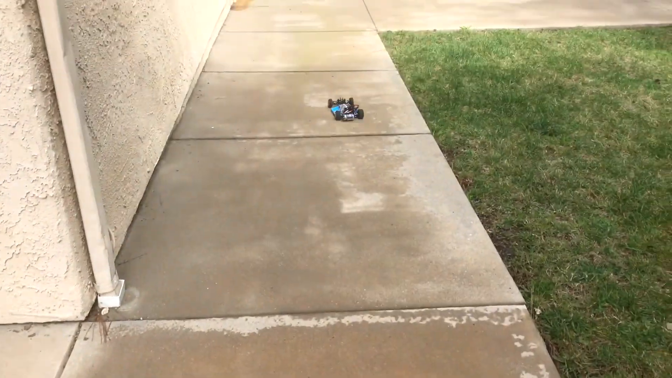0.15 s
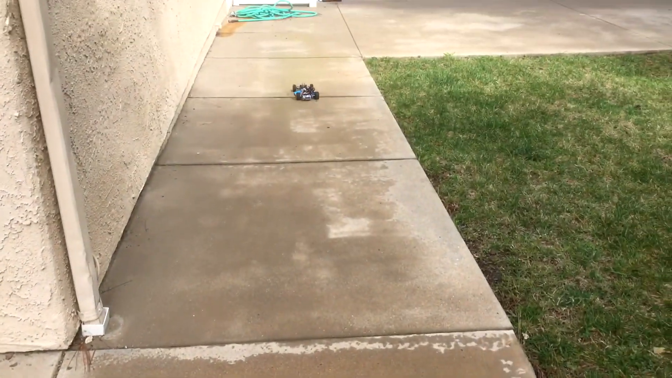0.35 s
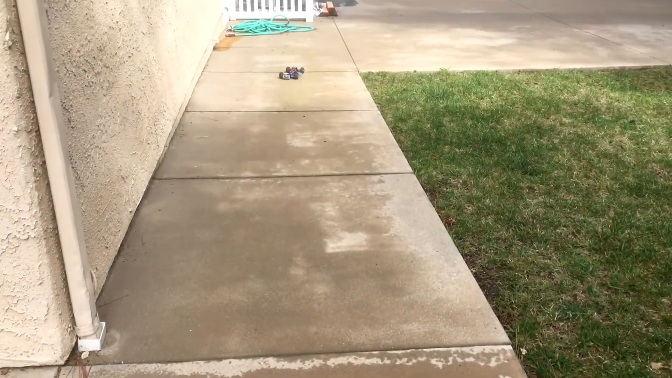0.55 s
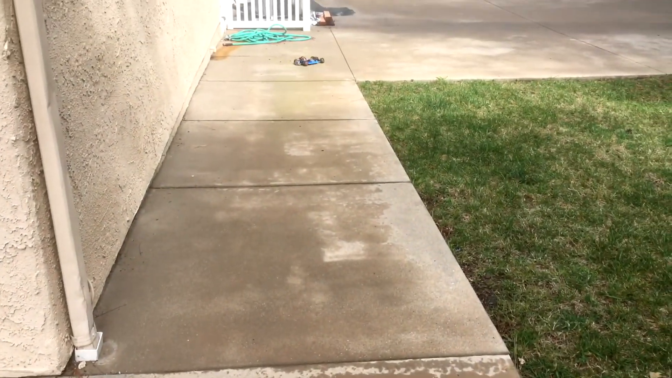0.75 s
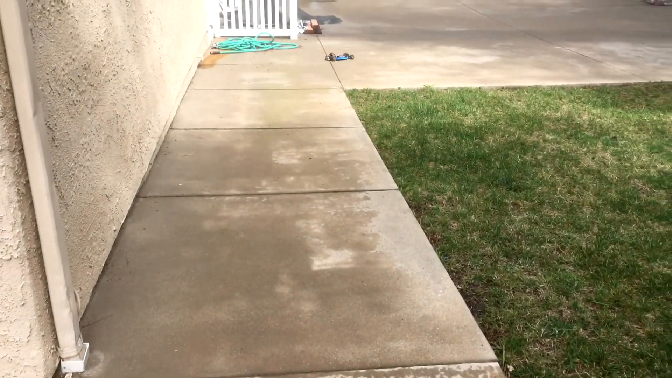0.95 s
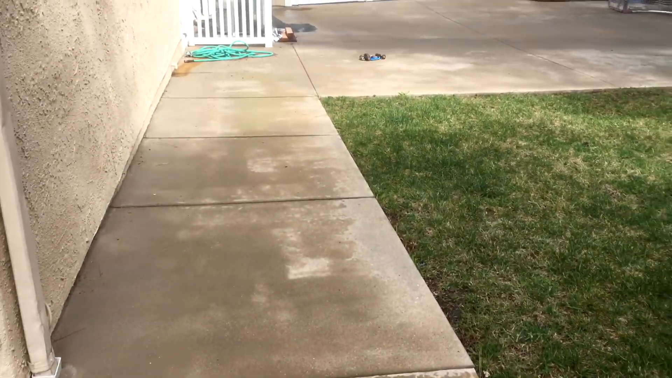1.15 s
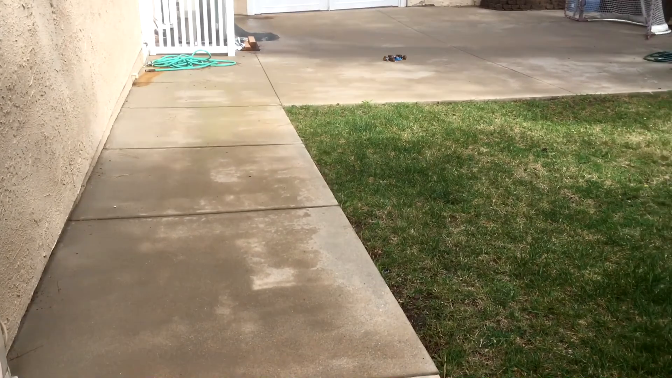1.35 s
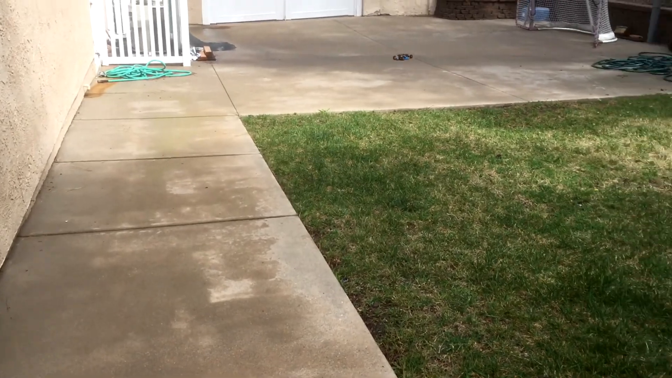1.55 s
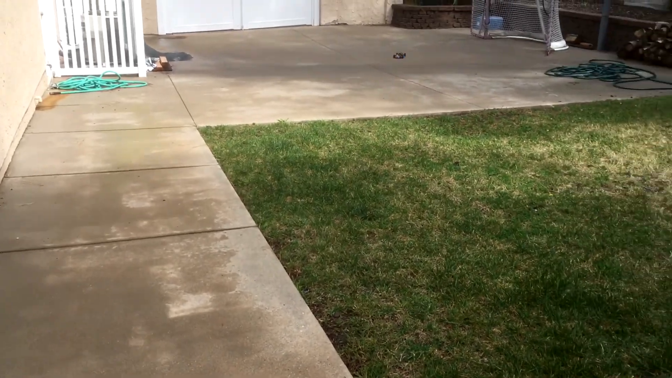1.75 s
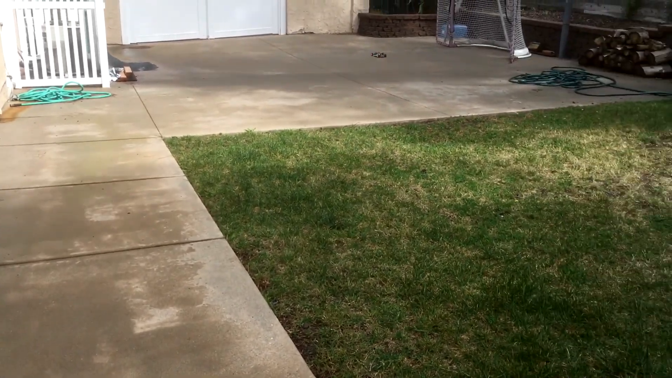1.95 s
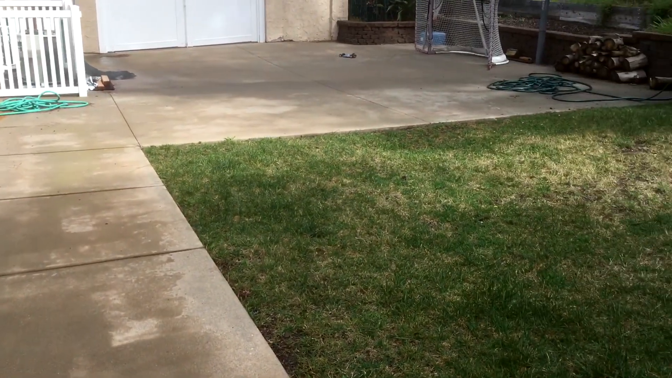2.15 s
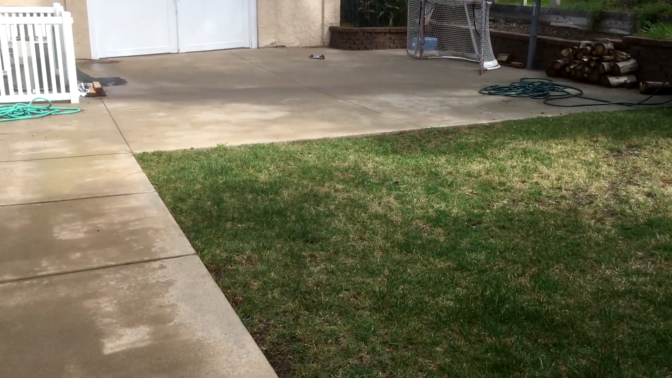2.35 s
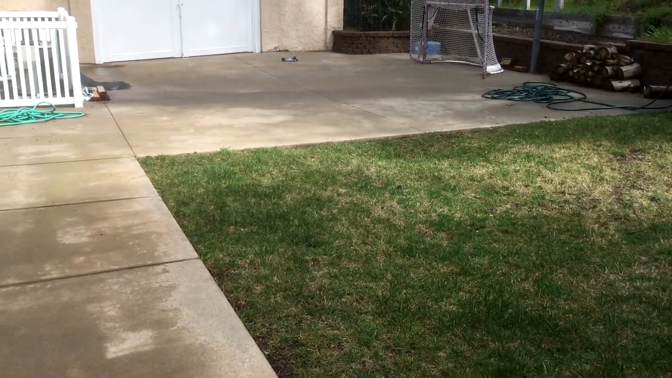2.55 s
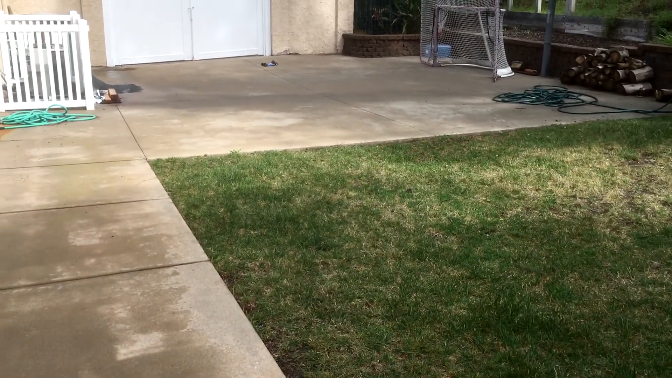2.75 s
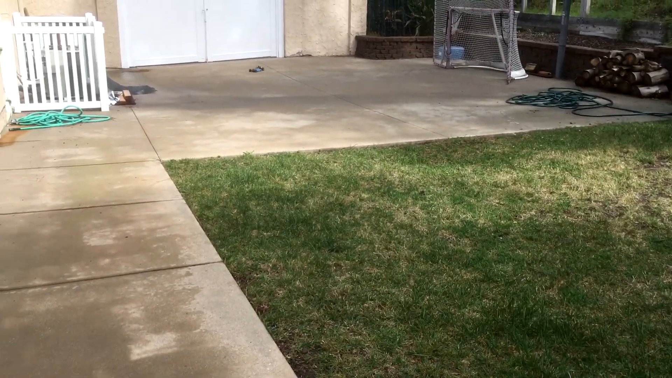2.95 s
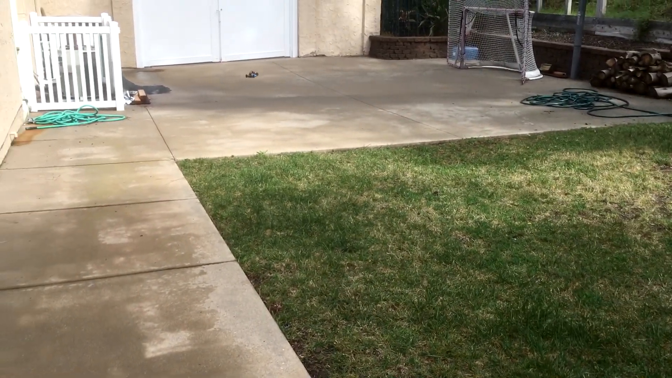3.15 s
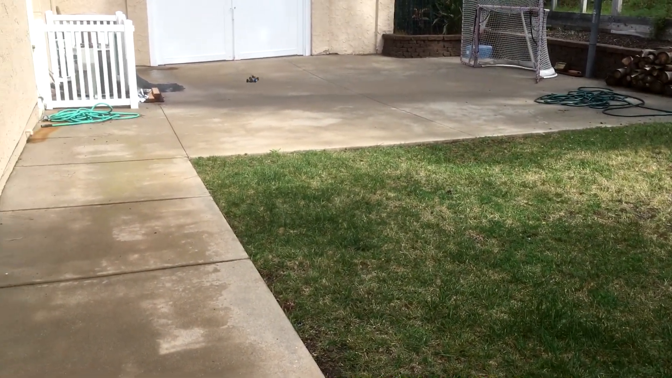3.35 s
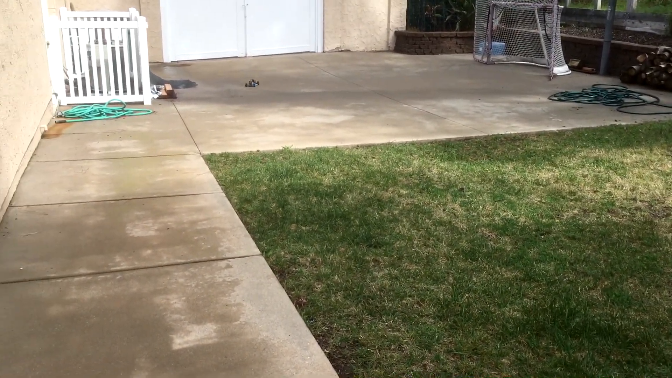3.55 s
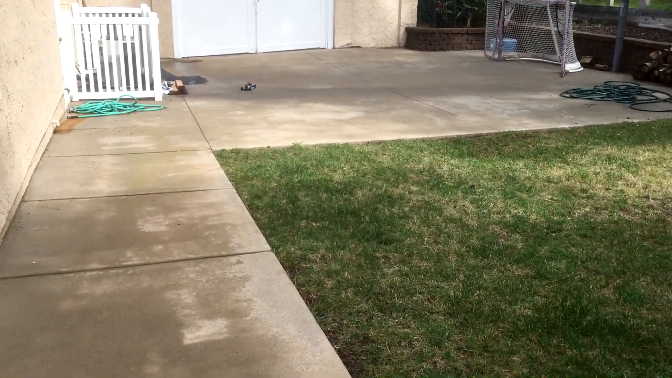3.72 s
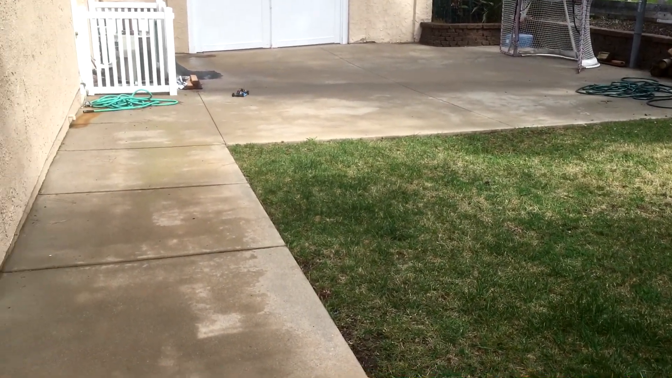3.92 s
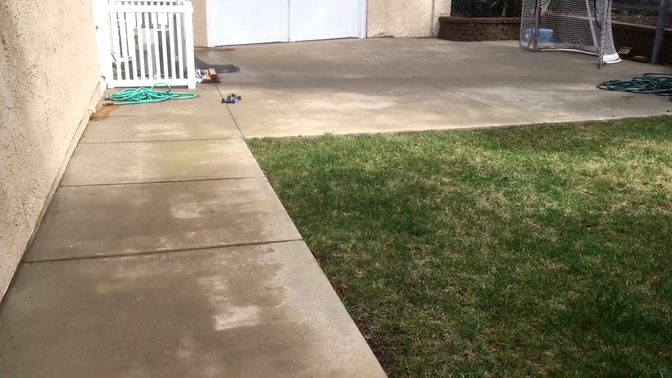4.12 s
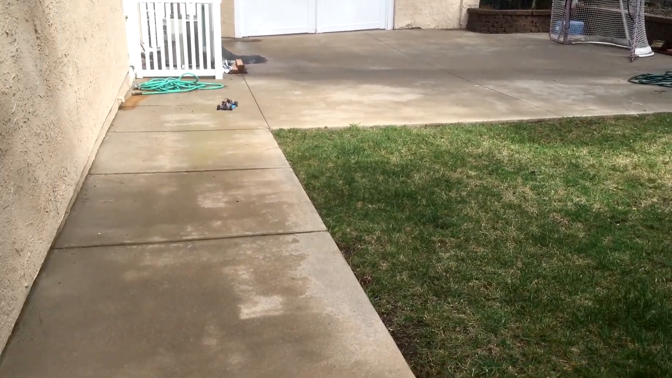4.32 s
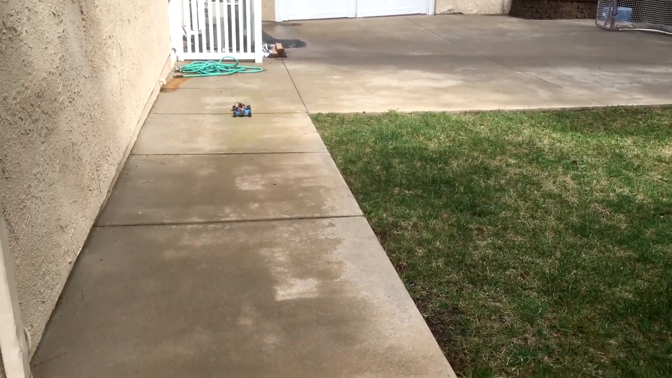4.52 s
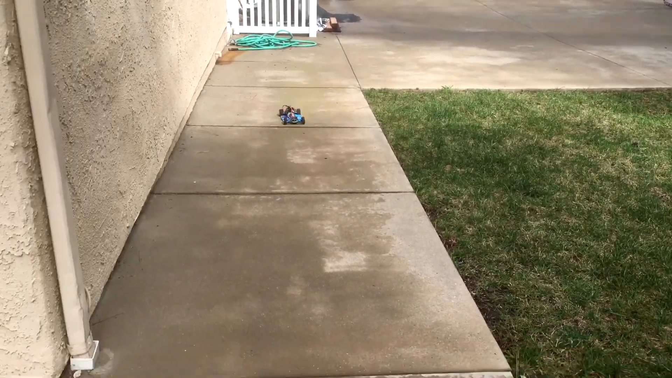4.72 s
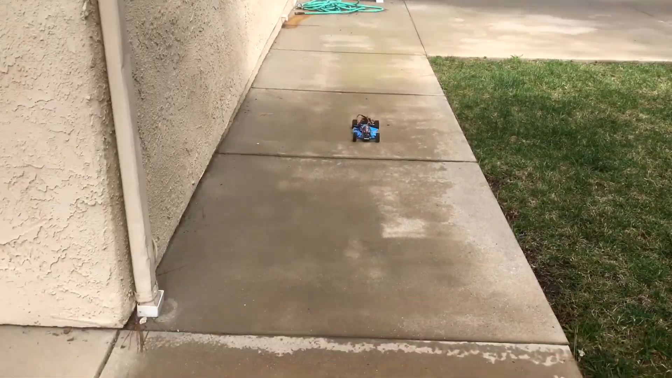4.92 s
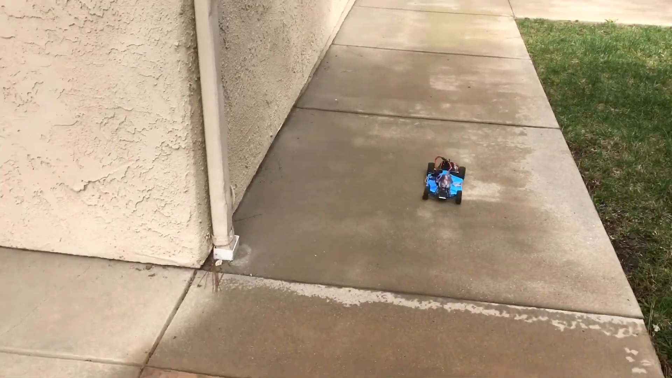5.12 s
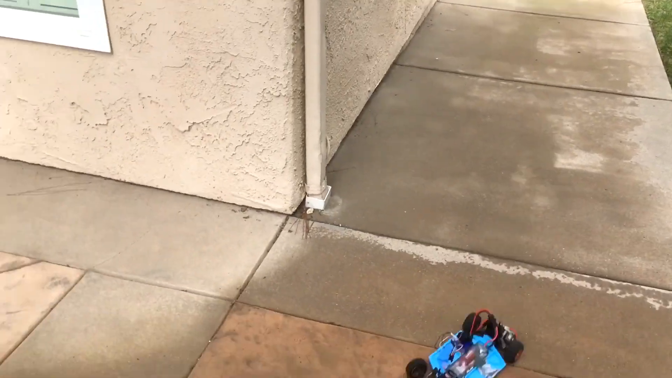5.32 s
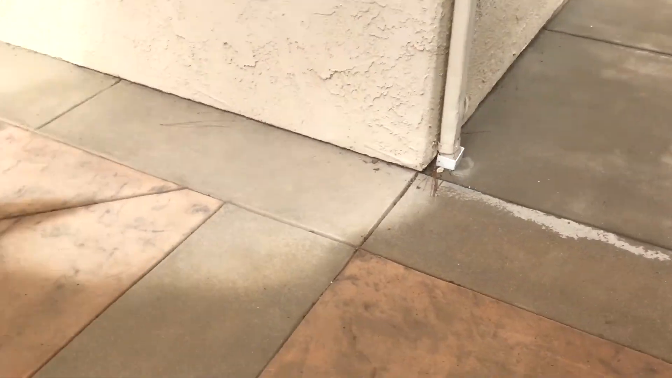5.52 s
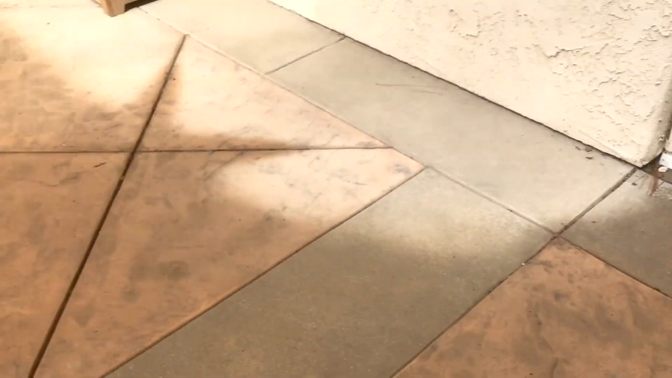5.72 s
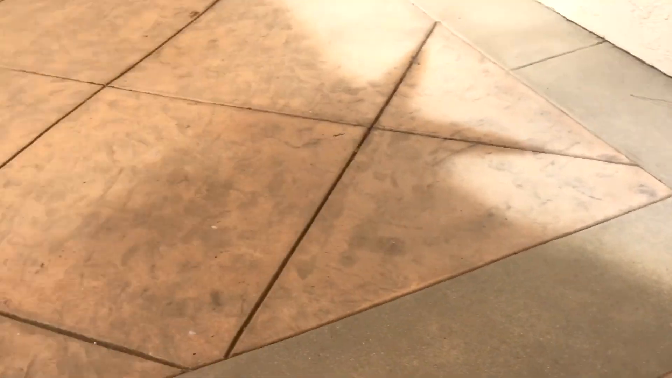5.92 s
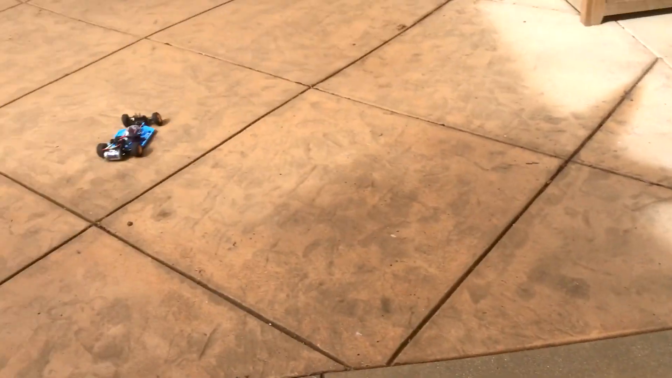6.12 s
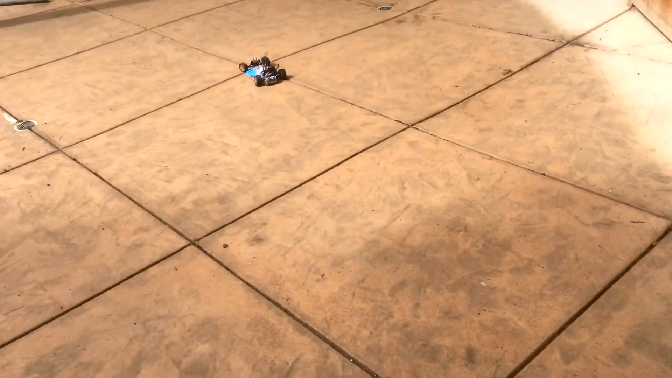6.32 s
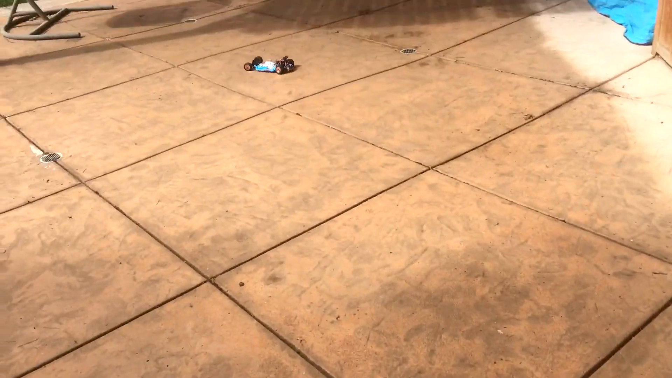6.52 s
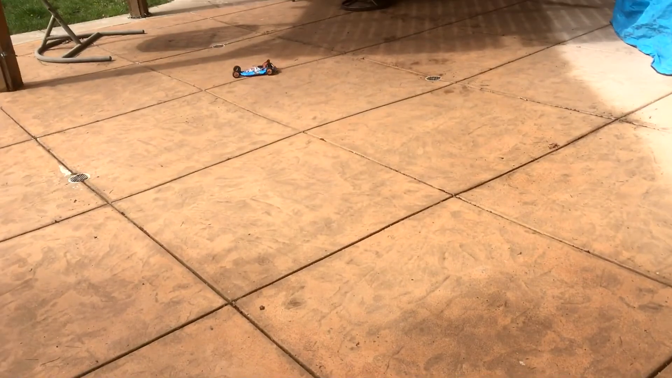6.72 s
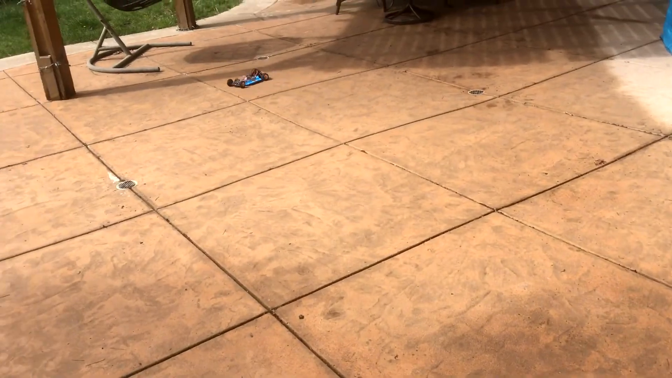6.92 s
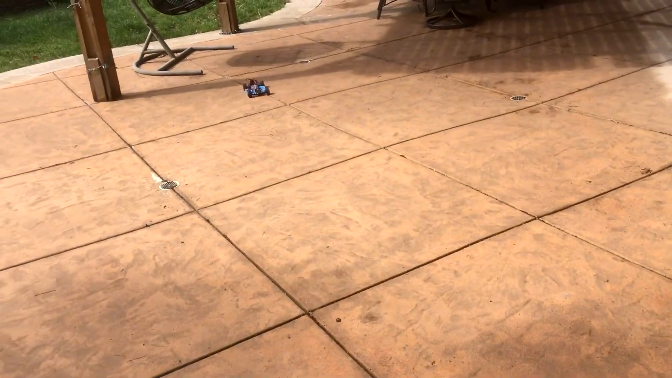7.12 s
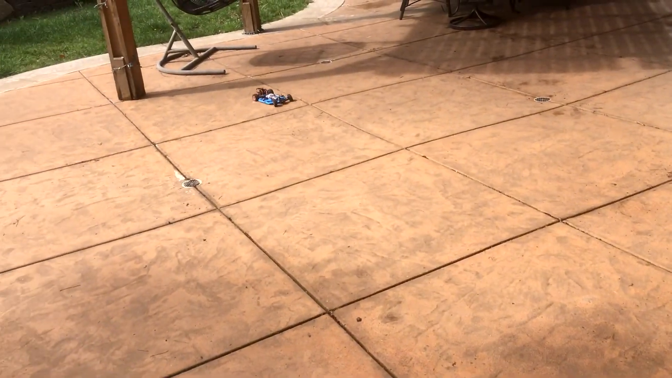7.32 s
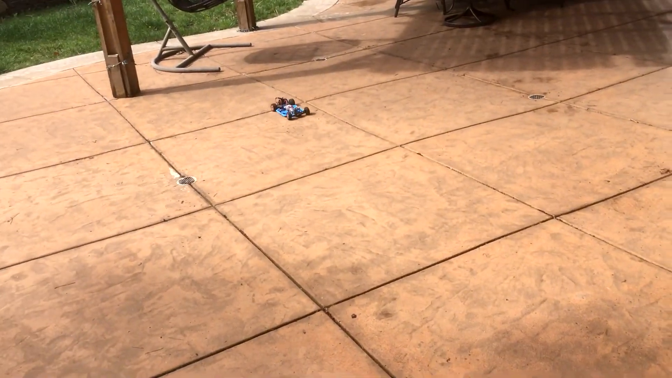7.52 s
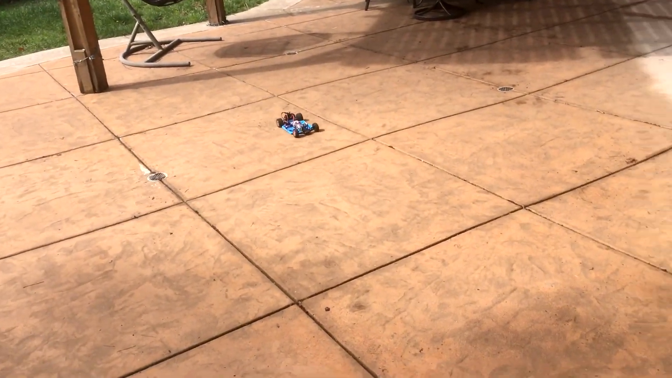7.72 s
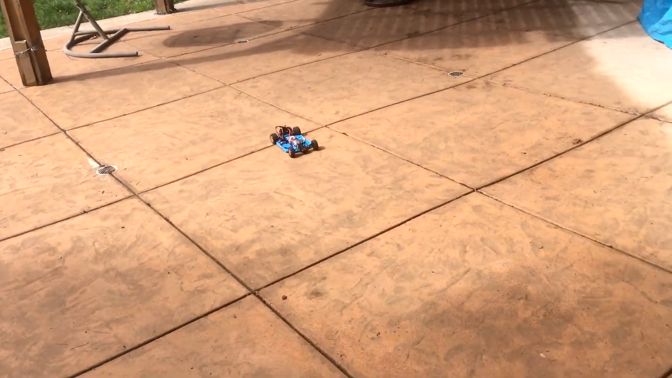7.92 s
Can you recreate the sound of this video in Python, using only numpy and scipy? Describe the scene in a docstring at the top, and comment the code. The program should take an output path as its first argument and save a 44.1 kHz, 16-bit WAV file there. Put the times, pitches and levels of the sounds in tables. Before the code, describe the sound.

A small electric remote-control car races away over concrete, its plastic gears giving a high, hissing rasp and whine, with two light clicks in the first second. Soft wind bumps the microphone over a faint outdoor hush. The whine peaks near 1.7 seconds, then the tyres roar on grit in a distant turn around 2 seconds. The pitch sinks and the car is far off near 2.7 seconds, with a slight sweeping echo from a wall. From 3 seconds it returns, rising in pitch and growing louder, with a low wind puff at 4.2 seconds. It passes close and loudest around 5.5 seconds, tyres scrubbing and the plastic body knocking quickly over slab joints between 5.2 and 5.9 seconds. With the breeze eased, it circles in short throttle bursts and draws away, slowing, knocking lightly twice near 7.8 seconds and speeding up again at the end.

```python
"""A small electric toy car races away over concrete while light wind bumps the microphone.
Its plastic gears whine and rasp, louder under load and softer off the throttle. About 2 s in, the
tyres roar on the grit as it turns in the far yard, and a house wall adds a sweeping echo.
It comes back, growing louder, and passes close at 5.5 s, knocking over joints in the slabs.
By then the breeze has eased, and the car circles a patio and draws away."""
import sys
import numpy as np
from scipy import signal
from scipy.fft import rfft, irfft, next_fast_len
from scipy.io import wavfile
from scipy.ndimage import uniform_filter1d, map_coordinates

SR = 44100
rng = np.random.default_rng(int(sys.argv[2]) if len(sys.argv) > 2 else 0)


def put_to_file(sound):
    """Save the sound as 16-bit audio at rate SR, in the file named by the first command-line argument."""
    columns = np.atleast_2d(sound).T  # one column per channel
    safe = np.clip(columns, -1, 1)
    whole_steps = np.round(safe * 32767)
    wavfile.write(sys.argv[1], SR, whole_steps.astype(np.int16))


N = 355887


def amp(db):
    """Turn decibels into a gain."""
    return 10 ** (np.asarray(db) / 20)


def unit(x):
    """Scale a signal to an average (rms) size of 1."""
    return x / np.sqrt(np.mean(x ** 2) + 1e-20)


def along(points, hz):
    """Read between (frequency, value) points on a log frequency axis."""
    f, values = np.transpose(points)
    return np.interp(np.log(hz + 1), np.log(f), values)


def curves(rows):
    """Join (time, values..) rows with straight lines: one curve per value column."""
    times, *columns = np.transpose(rows)
    return [np.interp(np.arange(N) / SR, times, column) for column in columns]


def spells(rows, rise_s, fall_s):
    """Each (start, length, values..) row rises, holds and falls: one sum per value column."""
    t = np.arange(N) / SR
    ramps = [np.minimum((t - s) / rise_s, 1 - (t - s - length) / fall_s) for s, length, *_ in rows]
    return np.array(rows)[:, 2:].T @ np.clip(ramps, 0, 1)


def wobble(rate):
    """A smooth random curve through `rate` new values a second."""
    return map_coordinates(rng.standard_normal(int(N * rate / SR) + 4), [np.arange(N) * rate / SR])


def filtered(x, response):
    """Give each frequency in x the gain response(hz)."""
    size = next_fast_len(N + SR // 4)
    return irfft(rfft(x, size) * response(np.fft.rfftfreq(size, 1 / SR)), size)[:N]


def coloured(x, spectrum):
    """Give x a tone colour (which pitches are strong), at size 1."""
    return unit(filtered(x, lambda hz: amp(along(spectrum, hz))))


def noise():
    """Plain white noise."""
    return rng.standard_normal(N)


def band(centre_hz, width_hz):
    """A tone blurred into a narrow band of noise, at size 1."""
    blur = [filtered(noise(), lambda hz: 1 / (1 + (hz / (1.02 * width_hz)) ** 2) ** 1.58)
            for _ in range(2)]
    phase = 2 * np.pi * np.cumsum(centre_hz * np.ones(N)) / SR
    return unit(blur[0] * np.cos(phase) + blur[1] * np.sin(phase))


# tone colours of the distant hush and of wind on the microphone: f/Hz, level/dB
HUSH_COLOUR = [(20, -23.5), (55, -3.5), (100, 2.5), (200, -0.5), (350, 1.5), (550, -2), (900, 3),
               (1400, -5.5), (2500, -10), (5000, -11), (16000, -46)]
WIND_COLOUR = [(15, -28), (35, -6.5), (55, 3), (90, -8), (160, -22), (400, -61)]
# puffs of wind: t/s, level/dB
PUFFS = [(.02, -59), (.47, -53), (.75, -57), (.99, -52), (1.18, -58), (1.33, -47.5), (1.49, -46),
         (3.56, -50), (3.82, -58), (4.18, -40.5)]

def outdoors(hush_db=-55, breeze_db=-64, ease_at_s=4.95, ease_db=5, puff_s=0.021):
    """A distant hush, a breeze that eases, and puffs that swell and die on the microphone."""
    t = np.arange(N) / SR
    eased = np.clip(2 * (t - ease_at_s), 0, 1)
    wind = amp(breeze_db + 2 * wobble(5.5) - ease_db * eased)
    for s, db in PUFFS:
        age = np.maximum(t - s, 0) / puff_s
        wind = wind + amp(db - 1) * age * np.exp(1 - age)
    return amp(hush_db) * coloured(noise(), HUSH_COLOUR) + wind * coloured(noise(), WIND_COLOUR)


# how long the yard's echo takes to fade by 60 dB: f/Hz, t/s
YARD_FADE = [(200, 0.36), (2000, 0.3), (12000, 0.09)]

def yard_echo(x):
    """Fences and buildings send back a short, blurred echo."""
    hz, t, slices = signal.stft(rng.standard_normal(SR // 2), SR, nperseg=256)
    fade = amp(-60 * t / along(YARD_FADE, hz)[:, None])
    tail = signal.istft(slices * fade, SR, nperseg=256)[1]
    late_tail = np.pad(tail, (SR // 100, 0)) / np.linalg.norm(tail)
    return signal.fftconvolve(x, late_tail)[:N]


# the lag of the wall's echo, longest in the far yard: t/s, delay/s
WALL_DELAY = [(0, 0.00063), (.6, .00054), (1.1, 0.00074), (1.7, 0.0024), (2.4, 0.002), (4.3, 0.00071),
              (5.2, .00063), (6.1, 0.000725), (8.07, .00064)]

def wall_echo(x, gain=0.24, dull_hz=11000):
    """A rough wall scatters the treble and returns the rest; the changing lag makes a sweep."""
    delay_s, = curves(WALL_DELAY)
    echo = filtered(x, lambda hz: 1 / np.sqrt(1 + (hz / dull_hz) ** 4))
    return gain * map_coordinates(echo, [np.arange(N) - delay_s * SR])


# how far the car is from the microphone: t/s, distance/m
PATH = [(0, 3.64), (.5, 4.63), (1.2, 6.18), (2, 9.4), (2.7, 13.2), (3.95, 8.16), (4.4, 5.6), (4.95, 4.48),
        (5.5, 2), (6.2, 2.57), (6.7, 3.4), (7.25, 4.5), (8.07, 6)]

def distance_db():
    """Sound thins out with distance: 0 dB at 1 m, less farther off."""
    return -20 * np.log10(curves(PATH)[0])


def heading(scale_m_per_s=3):
    """Near +1 while the car comes quickly closer, near -1 while it races away."""
    closing_speed = -np.gradient(curves(PATH)[0]) * SR
    return np.tanh(uniform_filter1d(closing_speed, size=SR // 3) / scale_m_per_s)


# the tyres scrub in the turns: t/s, length/s, extra level/dB
TURNS = [(.62, 0.32, 9), (1.8, .48, 10.5), (5.28, 0.49, 10.5), (6.42, 0.15, 7)]
# a low, hollow hum as the car passes closest: t/s, level/dB
CLOSE_HUM = [(5.2, -100), (5.42, -52), (5.68, -51), (5.78, -43.5), (5.87, -47.5), (6.1, -100)]
# tone colour of the tread on concrete: f/Hz, level/dB
TREAD_COLOUR = [(150, -38), (350, -14.5), (750, -5.5), (1050, 0), (1550, -3.5), (2100, -5), (2900, -10),
                (4000, -12), (6000, -13), (12000, -38)]

def tyres(roll_db=-43, falloff=0.74, hum_hz=590):
    """The tread patters over grit and roars in the turns; a hollow hum joins in close by."""
    scrub_db, = spells(TURNS, rise_s=0.13, fall_s=0.22)
    hum_db, = curves(CLOSE_HUM)
    patter = noise() * amp(2.5 * wobble(500) + wobble(70))
    roar_db = roll_db + scrub_db + falloff * distance_db()  # fades more slowly than the gears
    return amp(roar_db) * coloured(patter, TREAD_COLOUR) + amp(hum_db) * band(hum_hz, width_hz=170)


# wheels hit joints and grit: t/s, level/dB, the thump's extra level/dB
KNOCKS = [(.2543, -21, -35), (.7108, -19, -36), (5.208, -20, -14), (5.2905, -20, -19), (5.317, -13.5, -35),
          (5.328, -19, -13), (5.381, -13.5, -19), (5.3895, -11, -13.5), (5.558, -10.5, -32),
          (5.703, -18, -8.5), (5.8621, -18.5, -4.5), (7.7752, -21.5, -18), (7.8758, -24, -26)]
# tone colour of the plastic shell: f/Hz, level/dB
SHELL_COLOUR = [(150, -31), (400, -6.5), (1200, -7), (2500, 5.5), (4000, -8), (9000, -17)]

def knocks(fade_s=0.032, attack_s=0.00053, click_db=-9, thump_db=2):
    """Each jolt clicks the gear teeth (their colour is further down) and thumps the shell."""
    t = np.arange(SR // 8) / SR
    jolt = amp(-60 * t / fade_s) * (1 - np.exp(-t / attack_s))
    click, thump = np.zeros((2, N + SR))
    for s, db, extra_db in KNOCKS:
        click[round(s * SR):][:len(t)] += amp(db + click_db) * jolt
        thump[round(s * SR):][:len(t)] += amp(db + extra_db + thump_db) * jolt
    return click[:N] * coloured(noise(), TEETH_COLOUR) + thump[:N] * coloured(noise(), SHELL_COLOUR)


# tone colour of the motor's housing: f/Hz, level/dB
MOTOR_COLOUR = [(3000, -26.5), (5000, -6), (5900, -4.5), (6650, 0), (7500, -8), (9000, -8.5), (12000, -30)]

def motor_hiss(level_db, base_db=-41.5, falloff=0.65):
    """The housing spreads its hiss more evenly than the gears do, so it fades less with distance."""
    return amp(base_db + falloff * level_db) * coloured(noise(), MOTOR_COLOUR)


# a wandering band of noise that swells and fades with the car: t/s, f/Hz, level/dB at 1 m
MID_BAND = [(0, 1607, -69), (2.4, 1670, -39), (2.62, 1706, -33.5), (3.15, 1775, -40.5), (3.6, 1752, -34),
            (4.1, 1574, -40), (4.55, 1855, -35.5), (5.05, 1378, -40.5), (5.4, 1415, -43), (5.72, 1478, -30),
            (5.9, 1402, -38.5), (6.55, 1376, -44), (6.95, 1668, -40.5), (7.3, 1375, -46.5),
            (7.9, 1623, -38)]
# the chassis note sinks as the car drives off: t/s, f/Hz
CHASSIS_NOTE = [(.35, 3347), (.55, 3129), (1.6, 3000), (4.5, 2989), (8.07, 2913)]

def chassis_and_band(spur_angle, load_db, chassis_db=-41.5, nose_db=3.5):
    """The loose chassis rattles once per turn of the spur gear; a lower noise band flutters in step."""
    note_hz, = curves(CHASSIS_NOTE)
    mid_hz, mid_db = curves(MID_BAND)
    rattle = unit(amp(2 * np.sin(spur_angle) + 1.86 * wobble(120)))
    note = rattle * band(note_hz + 45 * wobble(7), width_hz=340)
    chassis = amp(chassis_db + load_db + nose_db * heading()) * note  # louder nose first
    mid_band = amp(mid_db + distance_db()) * rattle * band(mid_hz, width_hz=380)
    return chassis, mid_band


SPUR_TEETH = 56  # teeth on the big (spur) gear

def clatter(teeth, throb_db, chatter_db):
    """Teeth strike and slide, each at its own strength, harder once per turn of the spur gear."""
    count = np.arange(1, int(teeth[-1]))
    hit_at = np.searchsorted(teeth, count + rng.uniform(-.35, .35, len(count))).clip(0, N - 1)
    blows = np.bincount(hit_at, rng.standard_normal(len(count)), N)
    sliding = 1.46 * noise()
    throb = np.sin(2 * np.pi * teeth / SPUR_TEETH + 0.91 * wobble(25))
    return (unit(blows) + sliding) * amp(throb_db * throb + chatter_db * wobble(420))


# tone colours of the plastic teeth and of the case around them: f/Hz, level/dB
TEETH_COLOUR = [(300, -23), (1500, -15), (2300, -7), (4000, -5), (4900, -10.5), (6500, -3), (7700, -3),
                (8800, 1.5), (10400, -1.5), (11800, 1.5), (14500, 1), (16000, -5.5)]
CASE_COLOUR = [(7000, -45), (8000, -28), (8600, 2.5), (9300, 3), (9900, 6.5), (10400, -15), (11500, -23)]

def rasp(teeth, hiss_load_db, case_load_db, hiss_db=-27, case_db=-36, nose_db=-1):
    """Tooth blows hiss directly and ring the gear case; coming nose first hides a little hiss."""
    hiss = coloured(clatter(teeth, throb_db=-0.5, chatter_db=1.9), TEETH_COLOUR)
    ring = coloured(clatter(teeth, throb_db=4, chatter_db=1.5), CASE_COLOUR)
    return amp(hiss_db + hiss_load_db + nose_db * heading()) * hiss + amp(case_db + case_load_db) * ring


# the teeth bite and the whine sings out: t/s, length/s, extra level/dB
BITES = [(.38, .1, 4), (.77, .16, 13), (1.15, .48, 8), (1.63, .11, 16), (3.5, .95, 4), (3.7, .1, 8),
         (4.98, .3, 9), (5.65, .1, 8), (5.86, .32, 10), (6.2, .11, 10), (6.54, .1, 7), (6.88, .26, 5),
         (7.37, .24, 10.5), (7.8, .32, 9.5)]
# further gear tones: multiple of the tooth rate, level/dB
GEAR_TONES = [(.69, -12.5), (2, -5)]

def whine(tooth_hz, teeth, level_db, base_db=-46.5, width_hz=220, flutter_db=3):
    """Meshing teeth make a tone, blurred by their slack and throbbing with the off-centre spur gear."""
    bite_db, = spells(BITES, rise_s=.06, fall_s=.06)
    core = np.sin(2 * np.pi * teeth + 2 * wobble(90))
    blurred = 0.61 * core + 0.76 * band(tooth_hz, width_hz)
    tone = unit(blurred * amp(flutter_db * wobble(22)))
    for multiple, db in GEAR_TONES:
        tone = tone + amp(db) * band(multiple * tooth_hz, 0.54 * width_hz)
    # a higher tone sings out only while it crosses the pitch at which the gear case rings
    song = filtered(band(1.43 * tooth_hz, 2 * width_hz), lambda hz: amp(along(CASE_COLOUR, hz)))
    throb = np.sin(2 * np.pi * teeth / SPUR_TEETH)
    throbbing = tone * (1 + 0.27 * throb) + amp(2) * song * (1 + 0.99 * throb)
    return amp(base_db + bite_db + level_db) * throbbing


def drifting(x, depth_db=1.68):
    """The tone colour wanders slowly at random."""
    slices = signal.stft(x, nperseg=512)[2]
    patches = rng.standard_normal(slices.shape)
    for size, axis in (4, 0), (24, 1), (16, 1):  # smooth over pitch, then twice over time
        patches = uniform_filter1d(patches, size, axis)
    return signal.istft(slices * amp(depth_db * unit(patches)), nperseg=512)[1][:N]


# motor speed, as gear teeth meeting per second: t/s, f/Hz
TOOTH_RATE = [(0, 4450), (.15, 4620), (.48, 5680), (.77, 5300), (.9, 5330), (1.22, 4900), (1.55, 5800),
              (1.72, 6750), (1.9, 5200), (2.7, 3280), (3.2, 3700), (3.78, 4760), (3.93, 5300), (4.45, 5650),
              (4.95, 5800), (5.21, 6880), (5.4, 5900), (5.87, 5850), (5.94, 5200), (6.19, 5230),
              (6.28, 6400), (6.42, 5100), (6.66, 6900), (6.8, 4750), (7.1, 4400), (7.27, 4050),
              (7.44, 4120), (7.58, 3740), (7.65, 2900), (7.77, 2450), (8.07, 4070)]
# the gears work hard: t/s, length/s, then extra level/dB for each of hiss, gear case, chassis
LOADS = [(0, 0.25, .5, 6, 0.5), (.27, 0.24, 2, 4, 8), (.74, 0.28, 1.5, 5.5, -4), (1.47, 0.29, 4, 10.5, 13),
         (1.85, .4, -0.5, -1.5, 6.5), (3.22, 0.36, 3, 2, -1), (3.53, .3, -0.5, 1, 6),
         (4.24, 0.3, -1, -2, 4.5), (5.02, 0.27, 1.5, 6.5, 1.5), (5.41, 0.16, 3, -10, -11),
         (5.87, 0.047, 3.5, 5, 5), (6.15, .16, 2, 2, 2), (6.45, 0.36, 0, 0.5, -4), (7.57, .06, 2, 9, 0),
         (7.8, 0.31, 4.5, 8, 2)]
# the throttle is let go: t/s, length/s, drop in level/dB
THROTTLE_OFF = [(.55, .17, 1), (1.62, 0.17, 5), (3.11, .09, 1.5), (5.33, 0.073, 4.5), (5.62, 0.24, 0.5),
                (6.34, 0.097, 4.5), (7.66, 0.12, 2.5)]

def gearbox():
    """The motor spins plastic gears that rasp, rattle and whine, softer off the throttle."""
    tooth_hz, = curves(TOOTH_RATE)
    teeth = np.cumsum(tooth_hz) / SR  # how many teeth have met so far
    hiss_load_db, case_load_db, chassis_load_db = spells(LOADS, rise_s=0.042, fall_s=0.042)
    drop_db, = spells(THROTTLE_OFF, rise_s=0.012, fall_s=0.023)
    level_db = distance_db() - drop_db
    gears = rasp(teeth, hiss_load_db, case_load_db)
    motor = motor_hiss(level_db)
    chassis, mid_band = chassis_and_band(2 * np.pi * teeth / SPUR_TEETH, chassis_load_db)
    tone = whine(tooth_hz, teeth, level_db)
    return drifting(amp(level_db) * (gears + chassis) + motor) + mid_band + tone


def scene(yard_db=-14):
    """The car, its echoes and the open air, the same in both channels."""
    car = gearbox() + tyres() + knocks()
    mono = car + wall_echo(car) + amp(yard_db) * yard_echo(car) + outdoors()
    return np.array([mono, mono])


def record(dry, top_hz=15900):
    """Cut away the very highest treble."""
    return np.array([filtered(x, lambda hz: hz < top_hz) for x in dry])


dry = scene()
out = record(dry)
put_to_file(out)
```